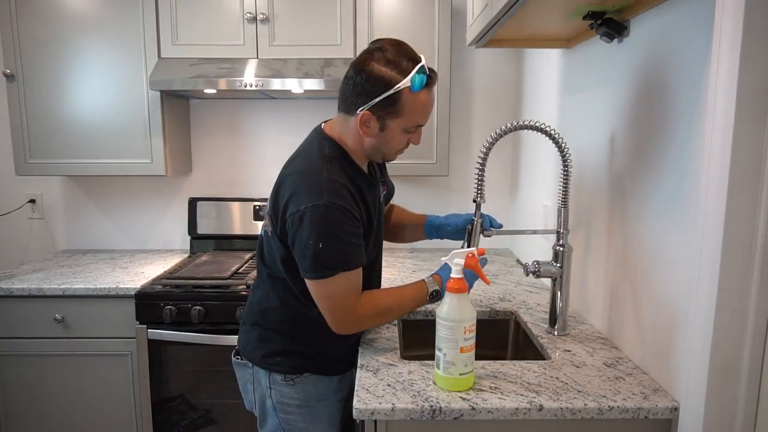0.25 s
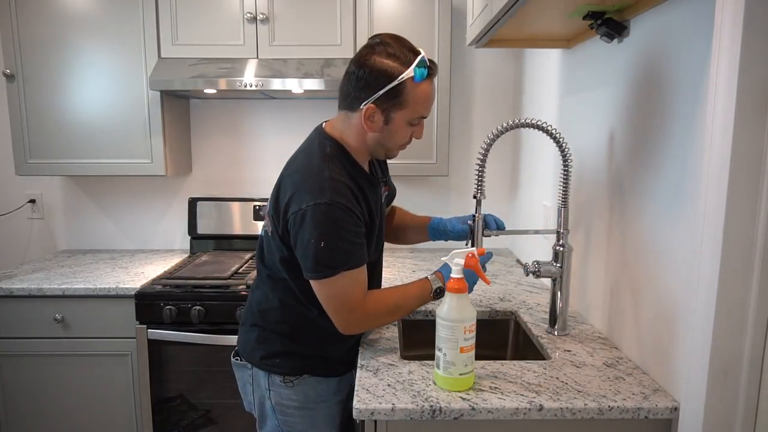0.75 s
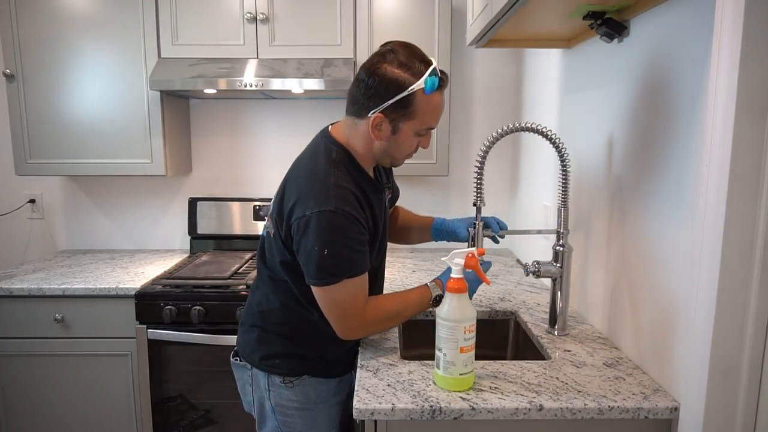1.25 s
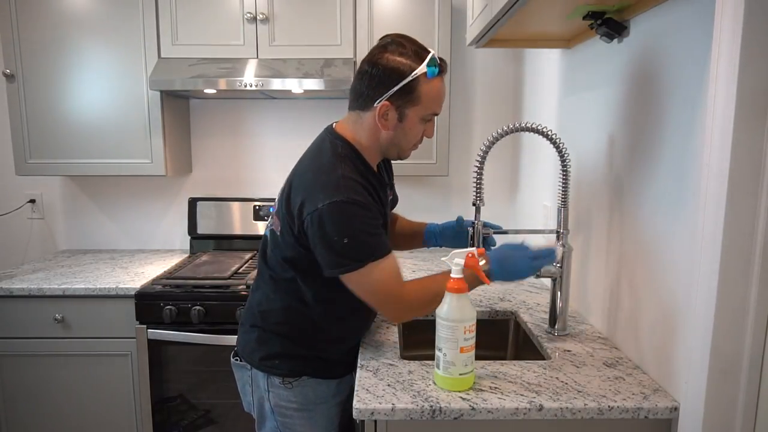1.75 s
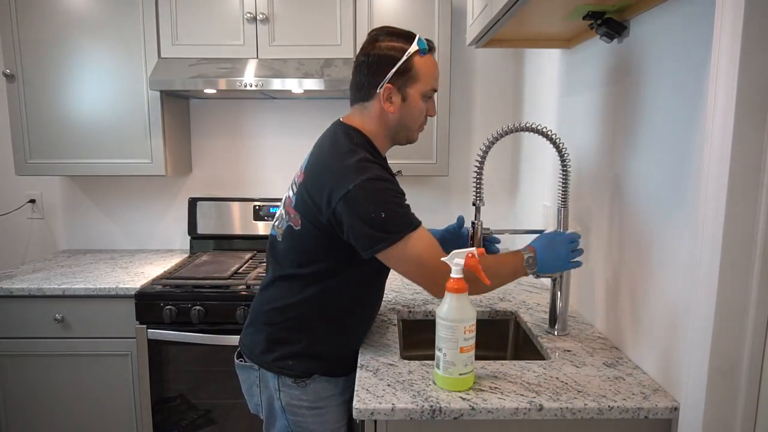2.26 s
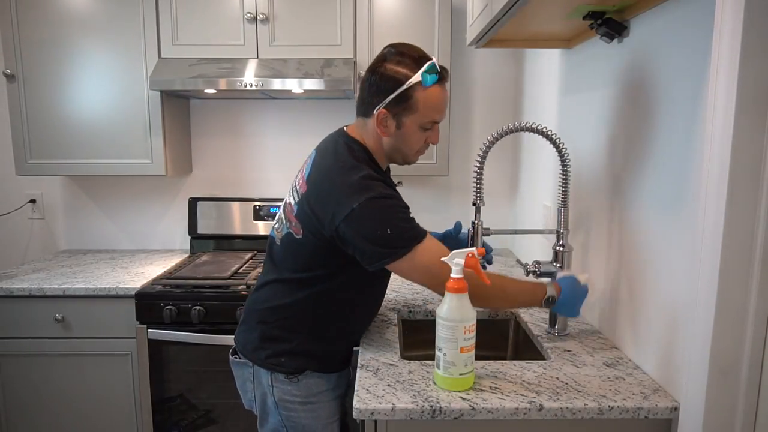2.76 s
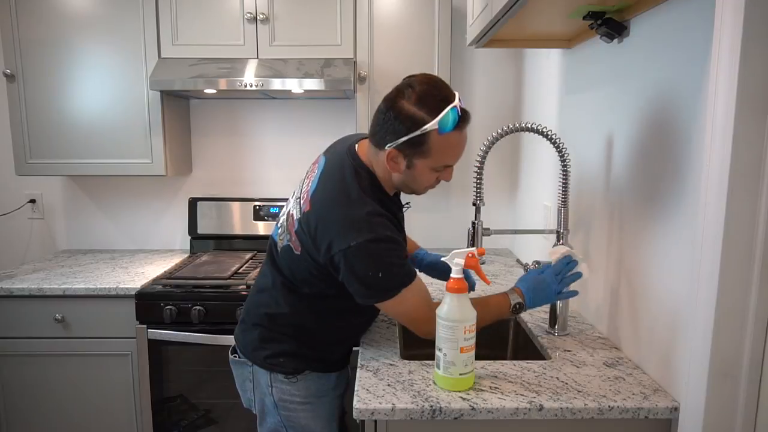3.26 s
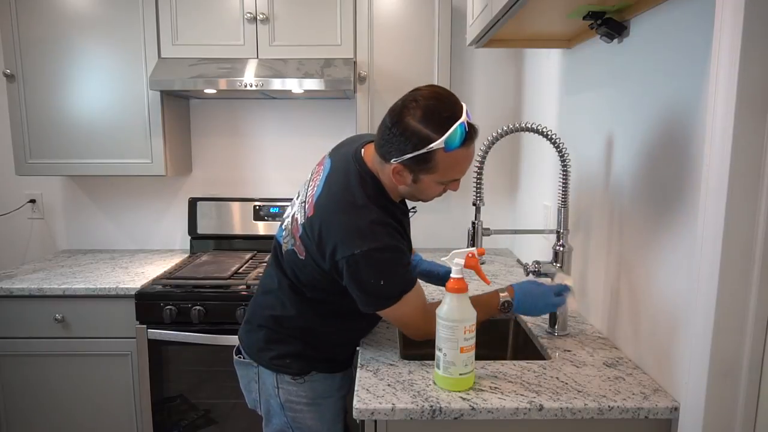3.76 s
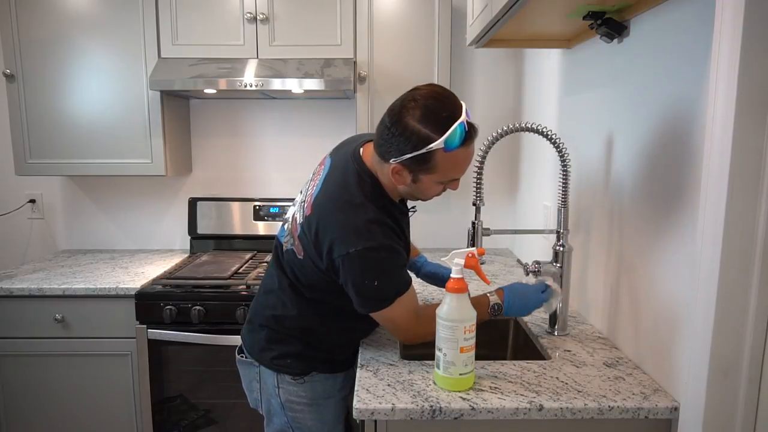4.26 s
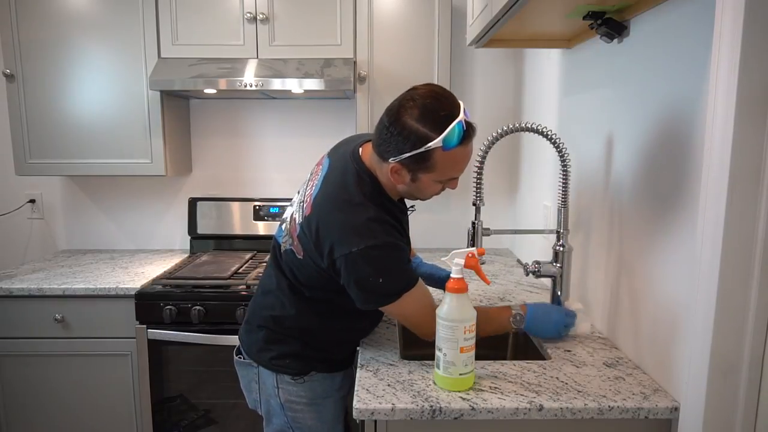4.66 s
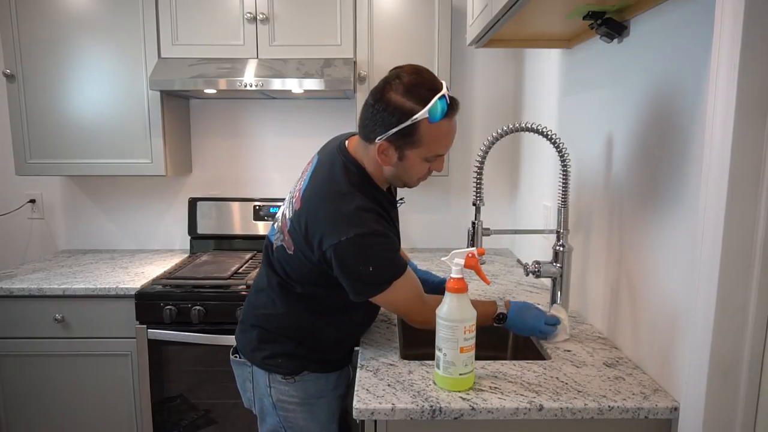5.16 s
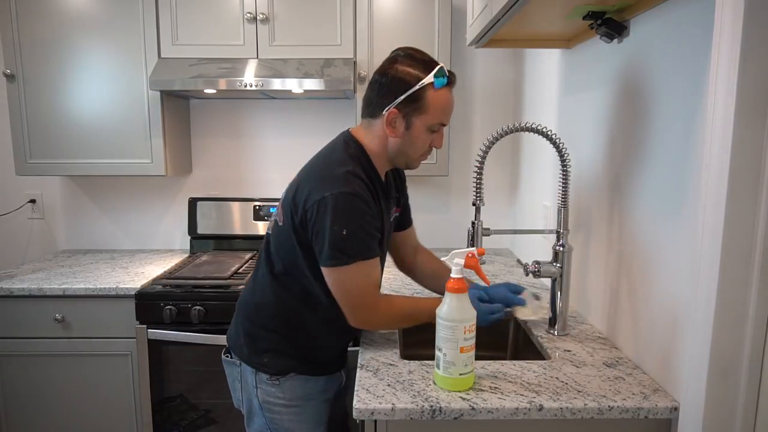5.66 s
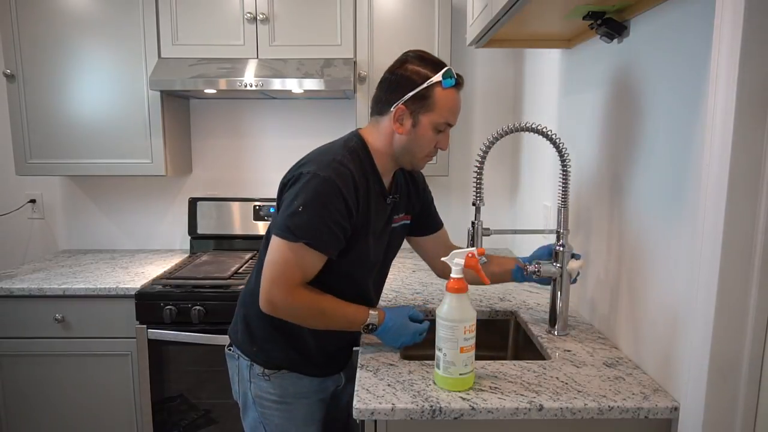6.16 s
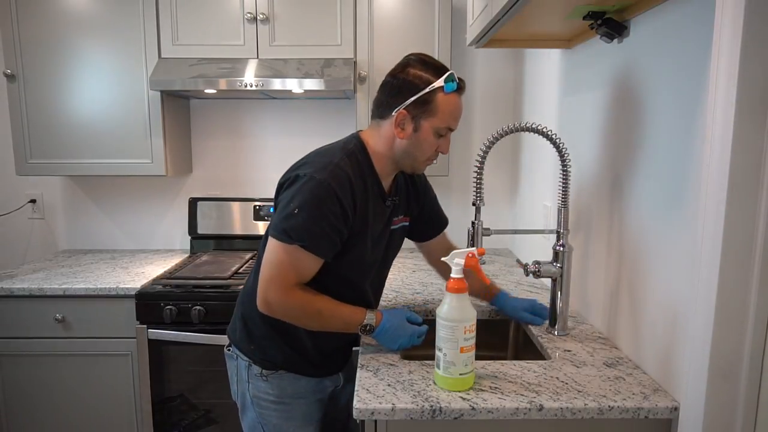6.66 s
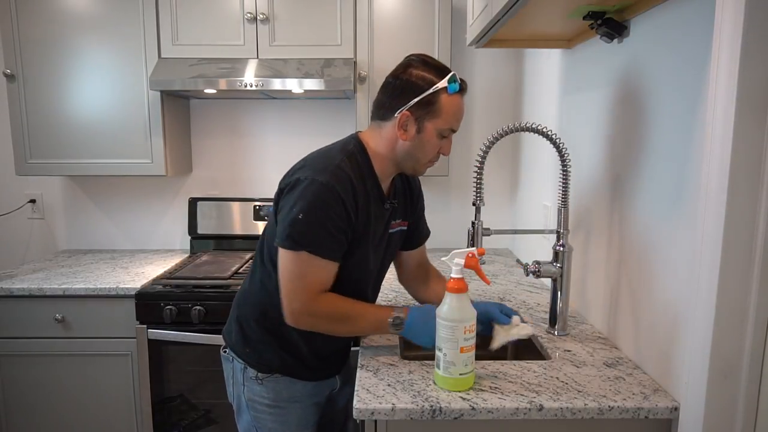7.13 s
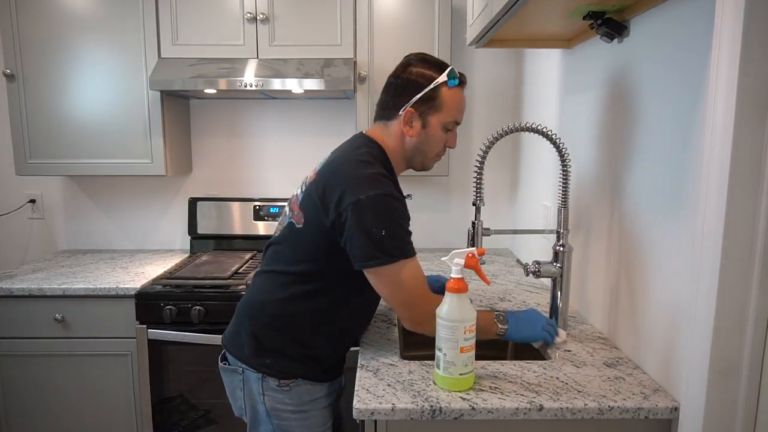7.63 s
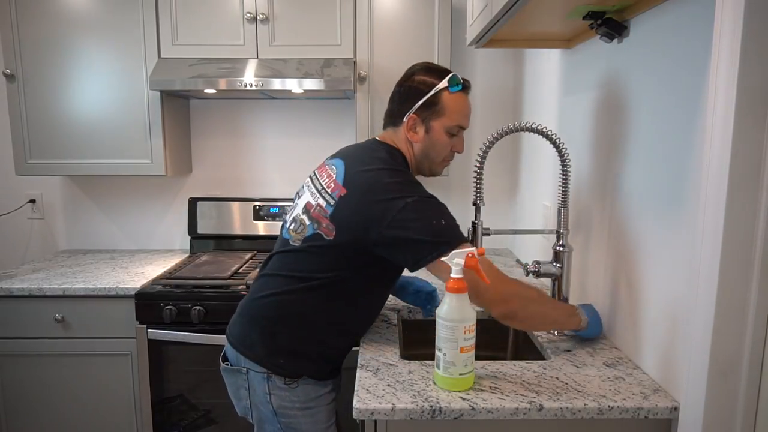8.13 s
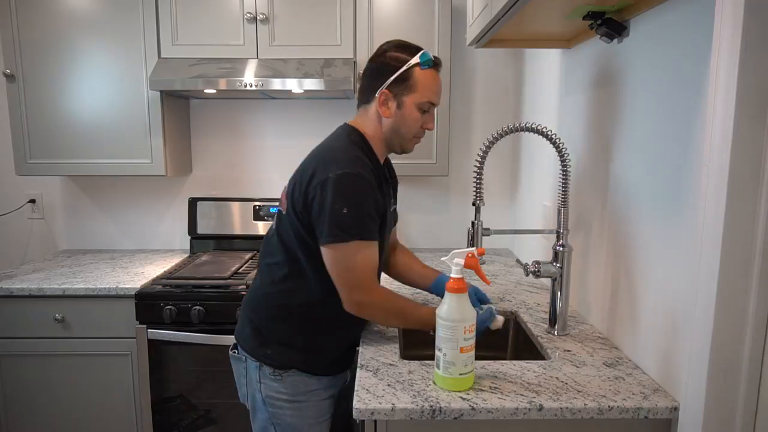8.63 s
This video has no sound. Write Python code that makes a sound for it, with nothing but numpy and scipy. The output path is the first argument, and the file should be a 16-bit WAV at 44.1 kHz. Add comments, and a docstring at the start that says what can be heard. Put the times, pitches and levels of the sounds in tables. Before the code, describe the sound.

In a quiet, hard-walled kitchen, an appliance hums steadily over a low rumble. A faucet's spray head bumps its holder, then snaps in with one click that rings the steel and booms in the sink. A cloth then rubs faintly over the faucet and stone countertop in short, uneven strokes, sometimes rasping, dotted with small taps. Low bumps come through the floor. The work sits straight ahead of the microphone.

```python
"""A cloth in a gloved hand wipes a steel faucet and a stone countertop in a quiet, hard-walled kitchen.
Its threads catch and slip, rasping when pressed hard. An appliance hums at twice the mains frequency
over a low rumble. Small taps dot the strokes and low bumps come up through the floor.
The spring-neck spray head bumps its holder, then snaps in with one click that rings the faucet
and booms in the sink."""
import sys
import numpy as np
from scipy import signal
from scipy.fft import rfft, irfft, next_fast_len
from scipy.io import wavfile
from scipy.ndimage import uniform_filter1d, map_coordinates

SR = 44100
rng = np.random.default_rng(int(sys.argv[2]) if len(sys.argv) > 2 else 0)


def bounce(signal):
    """Save signal as a 16-bit WAV file at the path given by the first command-line argument."""
    frames = np.transpose(np.atleast_2d(signal))
    limited = np.clip(frames, -1, 1)
    pcm = np.round(limited * 32767).astype(np.int16)
    wavfile.write(sys.argv[1], SR, pcm)


N = 392084


def amp(db):
    """Decibels to gain."""
    return 10 ** (np.asarray(db) / 20)


def unit(x):
    """Scaled to rms 1."""
    return x / np.sqrt(np.mean(x ** 2) + 1e-20)


def clock():
    """Sample times in s."""
    return np.arange(N) / SR


def along(points, hz):
    """(f/Hz, value) points read on a log axis."""
    f, values = np.transpose(points)
    return np.interp(np.log(hz + 1), np.log(f + 1), values)


def wobble(rate_hz):
    """Smooth random curve through rate_hz knots a second."""
    knots = rng.standard_normal(int(N * rate_hz / SR) + 4)
    return map_coordinates(knots, [clock() * rate_hz])


def filtered(x, response):
    """x through a gain that is a function of f/Hz."""
    size = next_fast_len(N + SR // 2)
    return irfft(rfft(x, size) * response(np.fft.rfftfreq(size, 1 / SR)), size)[..., :N]


def coloured(x, spectrum):
    """x shaped by a (f/Hz, level/dB) spectrum, at rms 1."""
    return unit(filtered(x, lambda hz: amp(along(spectrum, hz))))


def noise(spectrum):
    """Coloured noise, rms 1."""
    return coloured(rng.standard_normal(N), spectrum)


def decay(at_s, t60_s):
    """Envelope that jumps to 1 and dies away."""
    envelope, start = np.zeros(N + SR), max(round(at_s * SR), 0)
    envelope[start:start + SR // 4] = amp(-60 * np.arange(SR // 4) / SR / t60_s)
    return envelope[:N]


def ring(modes, scatter_db):
    """One second of struck modes, their strengths varying from blow to blow."""
    t = np.arange(SR) / SR
    return sum(amp(db + scatter_db * rng.standard_normal() - 60 * t / t60_s) * np.sin(2 * np.pi * hz * t)
               for hz, db, t60_s in modes)


def add(track, at_s, sound):
    """Mix a sound in; it may be under way at t = 0."""
    start = round(at_s * SR)
    sound, start = sound[max(-start, 0):], max(start, 0)
    track[start:start + len(sound)] += sound[:N - start]


# room decay: f/Hz, t60/s
ROOM_DECAY = [(150, 0.96), (600, 0.67), (3000, 0.9), (6000, 0.52), (10000, 0.35), (15000, 0.17)]

def kitchen(x, wet_db):
    """x plus the ring of tiles and cupboards, treble dying first."""
    hz, t, bins = signal.stft(rng.standard_normal(SR), SR, nperseg=256)
    tail = signal.istft(bins * amp(-60 * t / along(ROOM_DECAY, hz)[:, None]), SR, nperseg=256)[1]
    tail *= 1 - np.exp(-np.arange(len(tail)) / SR / 0.00043)
    return x + amp(wet_db) * signal.fftconvolve(x, tail / np.linalg.norm(tail))[:N]


def slips(rate_hz, spread_db, smooth, patchy_db):
    """Threads catch and let go: uneven impulses on a smooth rub whose colour shifts with the contact."""
    sizes = rng.standard_normal(N) * amp(spread_db * np.minimum(rng.exponential(size=N), 4))
    impulses = unit(sizes * (rng.random(N) < rate_hz / SR))
    bins = signal.stft(impulses + smooth * rng.standard_normal(N), nperseg=512)[2]
    patches = uniform_filter1d(rng.standard_normal(bins.shape), size=5, axis=0)
    patches = uniform_filter1d(patches, size=14, axis=1)
    return signal.istft(bins * amp(patchy_db * unit(patches)), nperseg=512)[1][:N]


def stroke(length_s, rise_s=0.039, sag_db=3.5, release_s=0.03):
    """Stroke envelope: the hand gets up to speed, eases its pressure, stops."""
    t = np.arange(SR) / SR
    rise = np.sin(np.pi / 2 * np.clip(t / rise_s, 0, 1)) ** 2
    sag = amp(-sag_db * np.clip(t / length_s, 0, 1))
    release = np.exp(-np.maximum(t - length_s, 0) / release_s)
    return rise * sag * release


# wipes: t/s, length/s, level/dB, brightness/dB
WIPES = [(-.05, 0.072, -42.5, -2), (0.011, 0.19, -55, 2), (1.57, 0.21, -58, 1.5), (1.904, 0.069, -56.5, 2),
         (1.965, 0.068, -48.5, 0), (2.075, 0.22, -61, 0), (2.28, 0.24, -60, 3.5), (2.553, 0.16, -58, 1.5),
         (2.696, 0.13, -55.5, 6.5), (2.912, 0.23, -60.5, 3), (3.219, 0.074, -50, 1.5),
         (3.467, 0.091, -55, 3), (3.66, 0.088, -58, 3), (3.827, 0.13, -54.5, 0), (4.14, 0.053, -55, -1),
         (4.289, 0.054, -55, -2), (4.392, 0.037, -55, -1), (4.561, 0.032, -53, -1),
         (4.727, 0.036, -52, 1.5), (4.843, 0.18, -66, 2), (5.001, 0.11, -57.5, 5.5), (5.162, 0.14, -61, 1),
         (5.281, .07, -54, 0), (5.439, 0.088, -53, -5), (5.506, 0.073, -45.5, 0), (5.619, .07, -51, 6),
         (5.71, 0.33, -55.5, -0.5), (6.02, 0.18, -65, 2), (6.25, 0.22, -62, -1), (6.589, 0.073, -46.5, -4),
         (6.665, 0.13, -55, 3), (6.789, 0.21, -55, 5), (7.047, 0.22, -60, -1), (7.278, 0.25, -53.5, 6),
         (7.556, 0.46, -52.5, 1), (8.114, 0.15, -51, -6), (8.287, 0.1, -55, -2), (8.363, .14, -50.5, 0.5),
         (8.609, 0.15, -49.5, 3), (8.757, .13, -62.5, 8)]
# cloth drag: f/Hz, level/dB
DRAG_SPECTRUM = [(150, -54), (350, 6.5), (600, -2), (1000, -0.5), (1600, -1), (2600, -2), (3300, 1.5),
                 (4000, -4), (5500, -11.5), (7500, -21.5), (15500, -34)]
# fibre hiss: f/Hz, level/dB
FIBRE_SPECTRUM = [(2500, -16), (5000, 6.5), (7000, 5), (9000, 1.5), (13000, -2), (15500, -2)]

def cloth(fibre_db=-9, rest_from_s=1.6, rest_db=-68, rest_bright_db=-6):
    """Cloth drags and its fibres hiss; from rest_from_s on it never quite leaves the surface."""
    resting = clock() > rest_from_s
    drag_power = resting * amp(rest_db) ** 2
    hiss_power = resting * amp(rest_db + rest_bright_db) ** 2
    for start_s, length_s, db, bright_db in WIPES:
        pressure = amp(db) * stroke(length_s)
        add(drag_power, start_s, pressure ** 2)
        add(hiss_power, start_s, (amp(bright_db) * pressure) ** 2)
    drag = coloured(slips(rate_hz=700, spread_db=0.5, smooth=1.0, patchy_db=1.5), DRAG_SPECTRUM)
    hiss = coloured(slips(rate_hz=3700, spread_db=1.0, smooth=1.5, patchy_db=-1.0), FIBRE_SPECTRUM)
    rub = np.sqrt(drag_power) * drag + np.sqrt(hiss_power) * hiss * amp(fibre_db)
    flutter_db = 2.14 * wobble(35)
    return kitchen(rub * amp(flutter_db), wet_db=-8.5)


# mains partials: f/Hz, level/dB
HUM_PARTIALS = [(59.5, -45), (120, -35), (240, -58.5)]

def appliance_hum():
    """Mains hum; standing waves bring it to the two sides out of step."""
    lead_rad, balance_db = np.array([[.2], [-.2]]), [[.65], [-.65]]
    hum = np.zeros((2, N))
    for hz, db in HUM_PARTIALS:
        gain = amp(db + 0.28 * wobble(1.4))
        drift_rad = 0.028 * wobble(1.2)
        hum += gain * np.sin(2 * np.pi * hz * clock() + lead_rad + drift_rad)
    return hum * amp(balance_db)


# left-right likeness of the room: f/Hz, correlation
COHERENCE = [(25, 1), (42, .98), (58, 0.13), (130, 0.21), (190, 0.72), (310, 0.48), (500, 0.78),
             (1000, 0.84), (1500, 0.99), (2000, 1)]

def wide(spectrum):
    """Stereo room noise, partly unrelated in the bass."""
    def angle_rad(hz):
        return np.arccos(np.clip(along(COHERENCE, hz), -1, 1)) / 2
    mid = filtered(noise(spectrum), lambda hz: np.cos(angle_rad(hz)))
    side = filtered(noise(spectrum), lambda hz: np.sin(angle_rad(hz)))
    return np.array([mid + side, mid - side])


# body shifts: middle t/s, length/s, deep level/dB, thump level/dB
BODY_SHIFTS = [(0.124, 0.55, -34, -56), (1.4, 1, -48, -56.5), (2.094, 0.21, -42, -46),
               (2.343, 0.45, -51, -66), (3.076, 0.83, -38, -57), (4.658, 0.23, -39, -42.5),
               (6.645, 0.22, -68, -42), (7.74, 0.6, -51, -42), (8.4, 0.65, -41, -46.5)]
# lowest rumble, the band above it, still air: f/Hz, level/dB
DEEP_SPECTRUM = [(8, 4), (20, 1), (32, 10), (50, -8), (120, -74)]
THUMP_SPECTRUM = [(25, -28), (52, -1.5), (85, 4), (120, -5.5), (250, -49)]
AIR_SPECTRUM = [(20, -7), (80, -4.5), (150, 2), (190, -8), (260, -9), (350, -11), (480, -19), (700, -20),
                (1230, -31), (3500, -33), (5700, -41.5), (9000, -50), (15500, -55.5)]

def room_tone(deep_db=-51, thump_db=-44.5, air_db=-46.8):
    """Still air and a steady rumble that swells as the body shifts."""
    deep, thump = amp(deep_db), amp(thump_db)
    for middle_s, length_s, deep_swell_db, thump_swell_db in BODY_SHIFTS:
        swell = np.cos(np.pi * np.clip((clock() - middle_s) / length_s, -.5, .5)) ** 2
        deep += amp(deep_swell_db) * swell
        thump += amp(thump_swell_db) * swell
    rumble = deep * wide(DEEP_SPECTRUM) + thump * wide(THUMP_SPECTRUM)
    balance_db = [[.3], [-.3]]
    return (rumble + amp(air_db) * wide(AIR_SPECTRUM)) * amp(balance_db)


# fingers and cloth on metal and stone: t/s, level/dB, hardness 0-1
CONTACTS = [(.315, -47, 0.82), (1.08, -38.5, 0.9), (1.159, -43, 0.83), (1.749, -46, 0.54),
            (2.168, -37.5, 0.13), (2.467, -37, 0.41), (2.754, -37, 0.24), (2.943, -40, 0.84),
            (3.027, -42, .5), (3.163, -37.5, 0.22), (3.362, -39, 0.22), (3.461, -37, 0.36),
            (3.657, -39, 0.27), (3.878, -35.5, 0.25), (4.364, -47.5, 0.97), (4.593, -34.5, 0.27),
            (4.856, -47.5, 0.93), (5.181, -35, .5), (5.198, -37.5, .5), (5.327, -44, 0.5),
            (5.471, -40.5, 0.07), (5.672, -34, 0.83), (6.274, -41.5, 0.83), (6.309, -40, 0.7),
            (6.6, -41, 0.15), (7.323, -38, 0.5), (7.778, -36, .3), (8.627, -42, 0.15), (8.657, -39, .5)]
# mix by touch: hardness 0-1, thud level/dB, body level/dB, tick level/dB
TOUCH_MIX = [(0, -6, -26, -25), (.5, -16, -5.5, -36), (1, -25, -16.5, -6.5)]
# parts of a tap: f/Hz, level/dB
THUD_SPECTRUM = [(100, -29), (300, -10), (700, 3), (1100, 1.5), (1800, -3.5), (5000, -57)]
BODY_SPECTRUM = [(500, -34), (900, -4), (1400, -1), (2300, -1), (3200, 4.5), (4500, -12), (8000, -20),
                 (15000, -38)]
TICK_SPECTRUM = [(2500, -15), (6000, 6.5), (11000, 3.5), (15500, -3)]

def taps():
    """Damped contacts: a soft pat thuds, a firm knock sounds hollow, a hard edge ticks."""
    thud, body, tick = np.zeros((3, N))
    steps, *parts = np.transpose(TOUCH_MIX)
    for at_s, db, hardness in CONTACTS:
        thud_db, body_db, tick_db = (db + np.interp(hardness, steps, part) for part in parts)
        thud += amp(thud_db) * decay(at_s, t60_s=0.12)
        body += amp(body_db) * decay(at_s, t60_s=0.05)
        tick += amp(tick_db) * decay(at_s, t60_s=0.054)
    knocks = thud * noise(THUD_SPECTRUM) + body * noise(BODY_SPECTRUM) + tick * noise(TICK_SPECTRUM)
    return kitchen(knocks, wet_db=-9.5)


# head against holder: t/s, then level/dB of ring, tink, clunk, snap, boom
HEAD_BLOWS = [(0.378, -47.5, -64, -36.5, -44, -34.5), (.557, -53, -46, -48, -66, -64),
              (1.285, -55, -50, -47, -71, -62), (1.3021, -28.5, -27.5, -38, -19, -26),
              (1.539, -59, -46, -49, -44.5, -61)]
# modes of faucet, holder clip and basin: f/Hz, level/dB, t60/s
FAUCET_MODES = [(390, -12.5, 0.53), (538, -5, 0.84), (568, -7, .71), (630, -16, 0.76), (655, -15, 0.36),
                (810, -23, 0.23), (1010, -15, 0.81), (1040, -23, 0.54), (2105, -10, 0.16),
                (3080, -10.5, 0.18), (3310, -11, 0.2), (4300, -8, 0.12), (6600, -9, .1), (6900, -28, .12),
                (10300, -37, .14), (10800, -33, .12)]
CLIP_MODES = [(940, -17, 0.097), (954, -3, 0.11), (978, 0, 0.21), (1050, -28, 0.11), (1120, -28, .12)]
BASIN_MODES = [(91.6, -6, 0.77), (124, -15, 0.38), (127.6, 3, 0.97), (157, -26, 0.27), (199, -2, 0.27)]
# clip contacts as it seats: delay/s, level/dB
CLIP_CHATTER = [(0, 0), (.0028, 0.5), (.0068, -1.5), (0.0102, -7.5)]
# clip snap, spring-neck clunk: f/Hz, level/dB
SNAP_SPECTRUM = [(150, 3), (600, 8.5), (1050, 15), (1400, -5), (2100, 2), (3200, 1), (4500, -4.5),
                 (7000, -6), (8500, -11), (11000, -6), (15500, -8)]
CLUNK_SPECTRUM = [(120, -20), (220, -2), (330, 7.5), (450, -5), (600, 5), (720, -9), (1000, -14),
                  (1500, -19), (4000, -38)]

def spray_head(rattle_db=2.5):
    """Each blow chatters in the holder, clunks through the neck, rings the steel and booms in the basin."""
    steel, basin, clunk, chatter = np.zeros((4, N))
    swell = 1 - np.exp(-np.arange(SR) / SR / 0.022)  # the heavy basin is slow to start
    for at_s, ring_db, tink_db, clunk_db, _, boom_db in HEAD_BLOWS:
        add(steel, at_s, amp(ring_db) * ring(FAUCET_MODES, scatter_db=1.1))
        add(steel, at_s, amp(tink_db) * ring(CLIP_MODES, scatter_db=-2.0))
        add(basin, at_s, amp(boom_db) * swell * ring(BASIN_MODES, scatter_db=2.0))
        clunk += amp(clunk_db) * decay(at_s, t60_s=0.25)
    steel *= amp(rattle_db * wobble(110))  # loose coil against the ringing pipe
    for delay_s, db in CLIP_CHATTER:
        contact = sum(amp(snap_db + db) * decay(at_s + delay_s, t60_s=0.018)
                      for at_s, _, _, _, snap_db, _ in HEAD_BLOWS)
        chatter += kitchen(contact * noise(SNAP_SPECTRUM), wet_db=-5)
    return basin + steel + kitchen(clunk * noise(CLUNK_SPECTRUM), wet_db=-5.5) + chatter


# floor bumps: t/s, thump level/dB, hollow ring level/dB
BUMPS = [(.378, -33.5, -34), (.679, -34, -45), (.91, -31, -42), (1.131, -32, -42), (1.285, -25.5, -27),
         (4.6, -40, -54), (5.19, -37, -55), (6.274, -36, -45), (6.599, -33, -54), (7.621, -36, -67),
         (8.5, -40, -67)]
# modes of floorboards and stand: f/Hz, level/dB, t60/s
FLOOR_MODES = [(73, -3, 0.2), (94.7, 4, 1), (105, -21, 0.19)]
STAND_MODES = [(200, 2, .2), (295, -1.5, 0.84), (315, -5, .3), (385, -6, 0.18), (475, -9, 0.38),
               (980, -29, 0.15)]

def floor_bumps(scatter_db=3):
    """Low bumps come up through the floor and reach left and right in opposite phase."""
    sway = np.zeros(N)
    swell = 1 - np.exp(-np.arange(SR) / SR / 0.01)
    for at_s, thump_db, ring_db in BUMPS:
        add(sway, at_s, amp(thump_db) * swell * ring(FLOOR_MODES, scatter_db))
        add(sway, at_s, amp(ring_db) * ring(STAND_MODES, scatter_db))
    return np.array([sway, -sway])


# narrow rasps, mostly hard-pressed strokes, the last a faint hiss near 4.2 kHz: start t/s, end t/s, f/Hz,
# width/Hz, level/dB
RASP_BANDS = [(2.94, 3.193, 1310, 220, -60), (5.545, 5.743, 3060, 1000, -54), (6.78, 6.98, 3520, 250, -65),
              (7.34, 7.468, 2650, 1400, -53), (7.918, 8.024, 1450, 400, -55), (8.05, 8.26, 1470, 500, -58),
              (8.387, 8.517, 4230, 1000, -57)]

def rasps():
    """Under pressure the slips fall nearly into step and narrow to one band."""
    rasp = np.zeros(N)
    for start_s, end_s, hz, width_hz, db in RASP_BANDS:
        band = unit(filtered(rng.standard_normal(N), lambda f: 1 / (1 + (2 * (f - hz) / width_hz) ** 2)))
        progress = np.clip((clock() - start_s) / (end_s - start_s), 0, 1)
        rasp += amp(db) * band * np.abs(np.sin(np.pi * progress)) ** .5
    return rasp


def scene():
    """Work at the sink, straight ahead, inside the room's hum."""
    sink_work = cloth() + rasps() + spray_head() + taps()
    return sink_work + floor_bumps() + appliance_hum() + room_tone()


# stereo width: t/s, side gain
SIDE_GAIN = [(0, 1), (1.5, 0.33), (1.8, 0.0022), (3.84, 0.036), (3.95, 0.34), (8.89, 1)]

def record(dry):
    """The image narrows to the centre, then widens again; the top treble is cut."""
    top_hz = 15850
    mid = dry.mean(axis=0)
    width = np.interp(clock(), *np.transpose(SIDE_GAIN))
    return filtered(mid + width * (dry - mid), lambda hz: hz < top_hz)


dry = scene()
out = record(dry)
bounce(out)
```